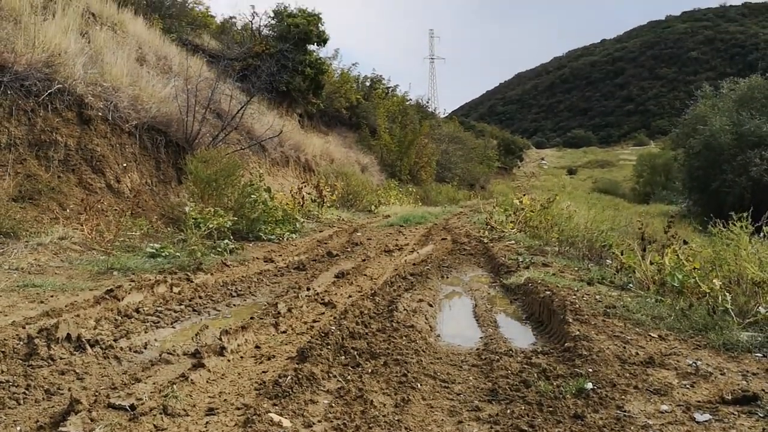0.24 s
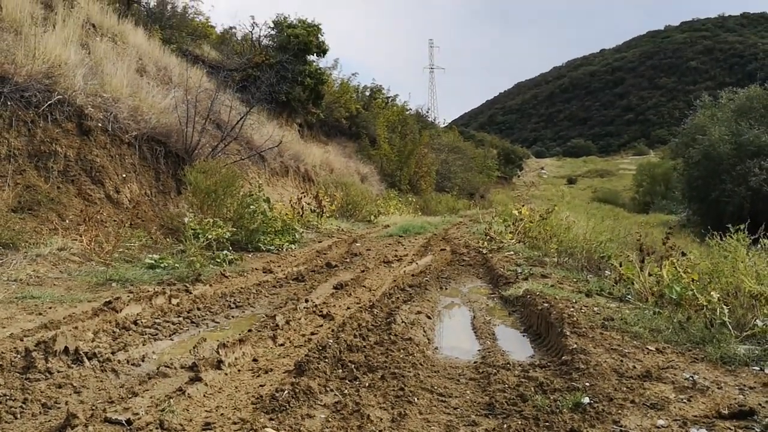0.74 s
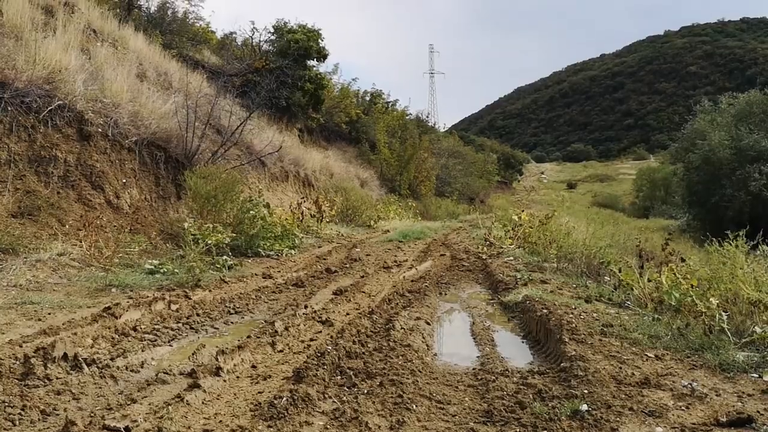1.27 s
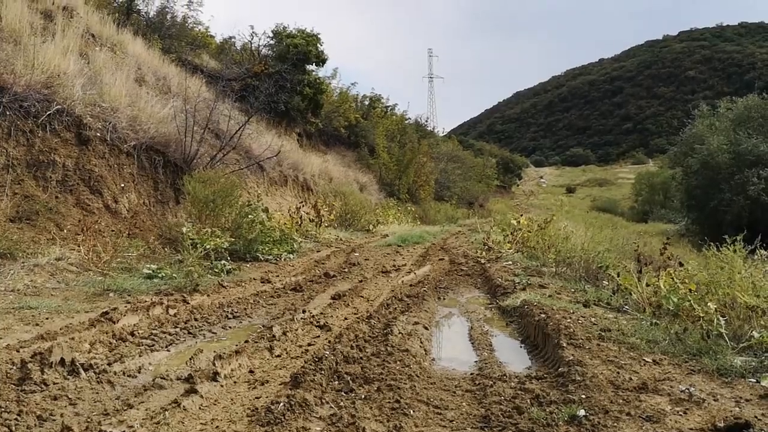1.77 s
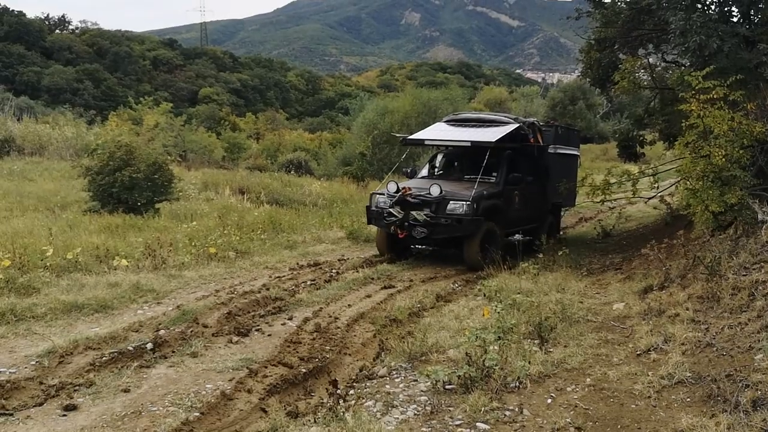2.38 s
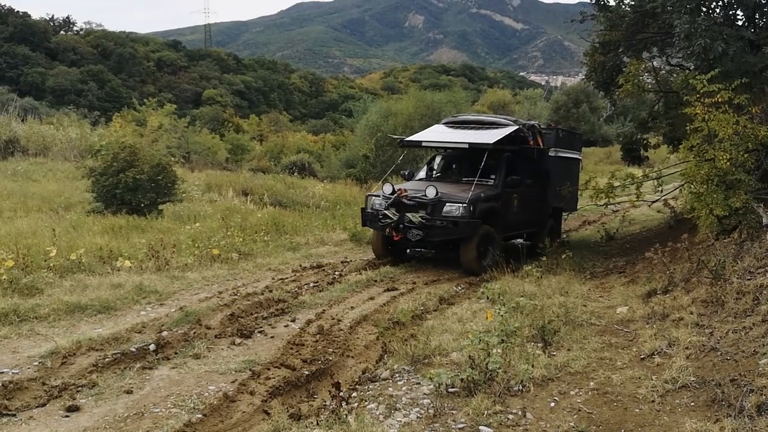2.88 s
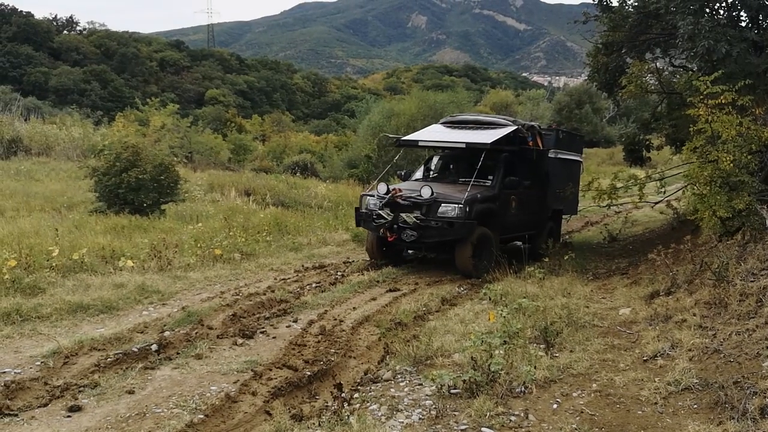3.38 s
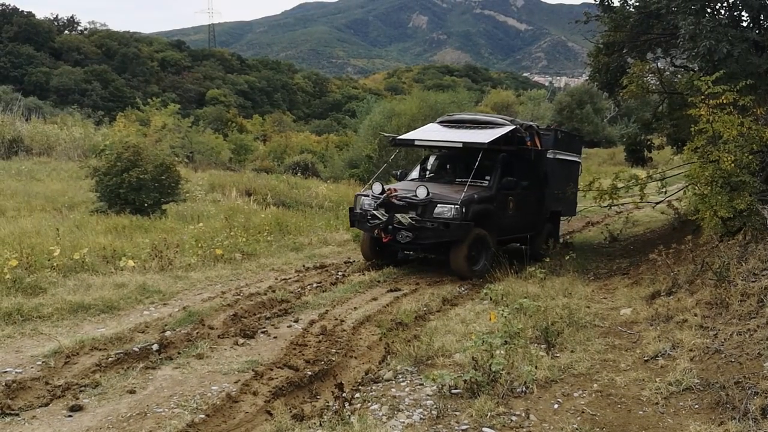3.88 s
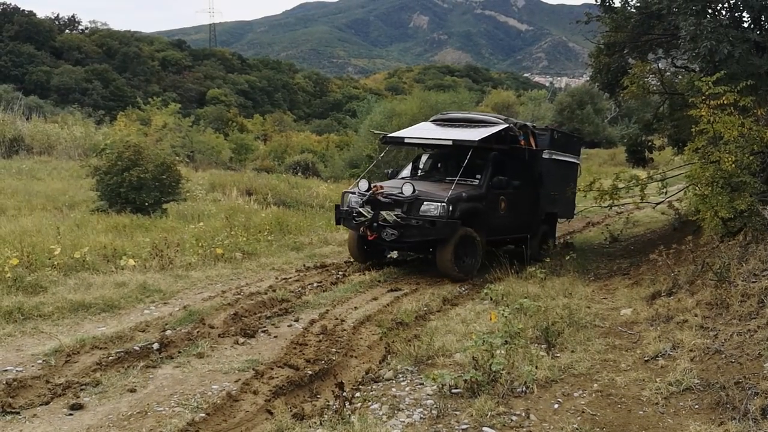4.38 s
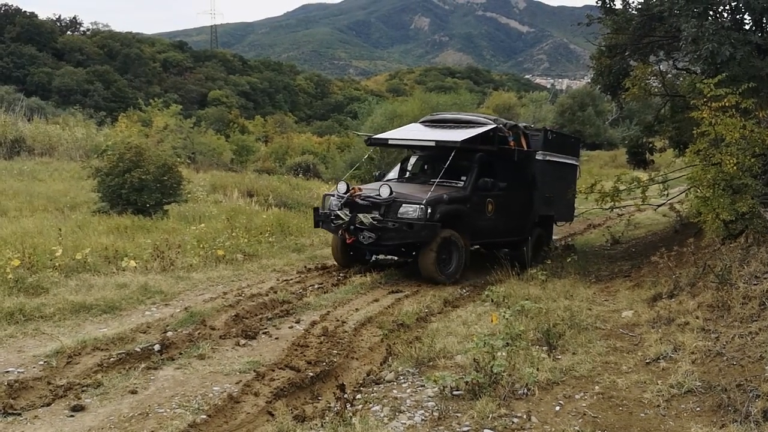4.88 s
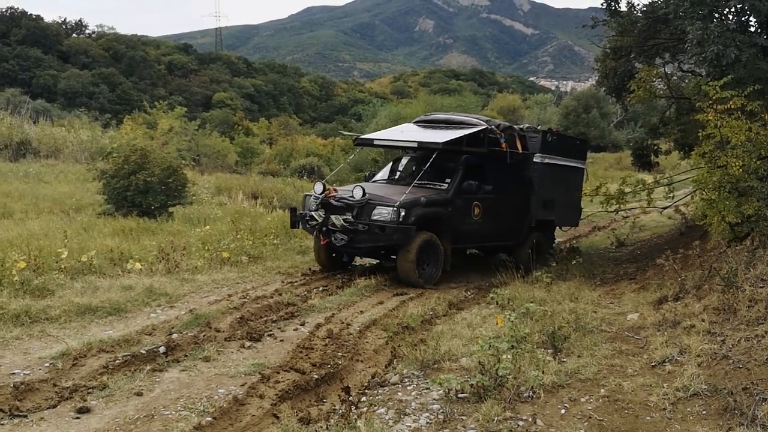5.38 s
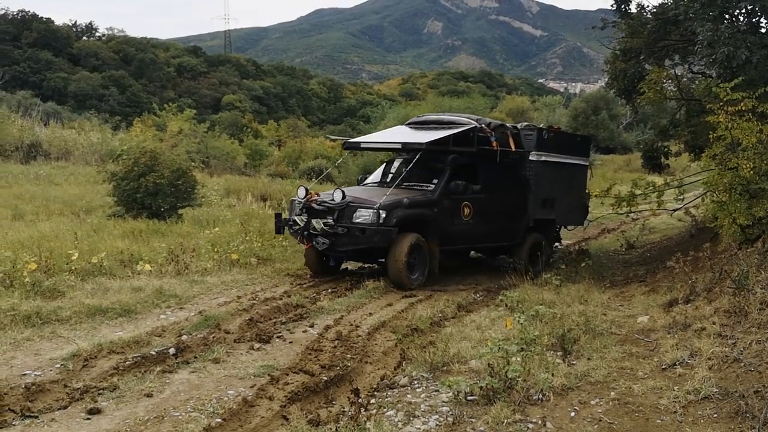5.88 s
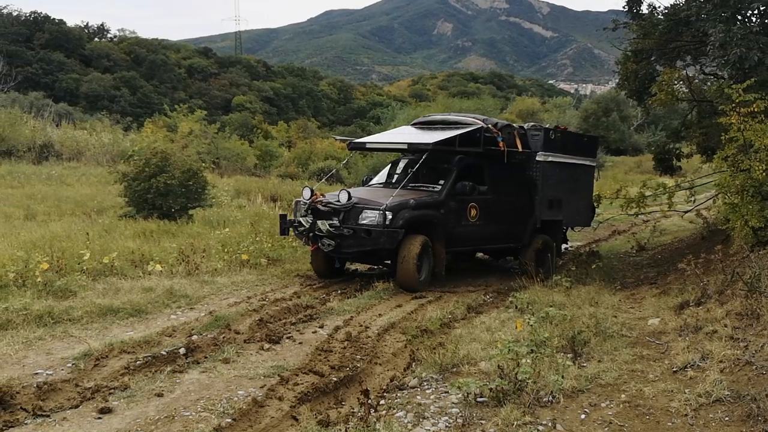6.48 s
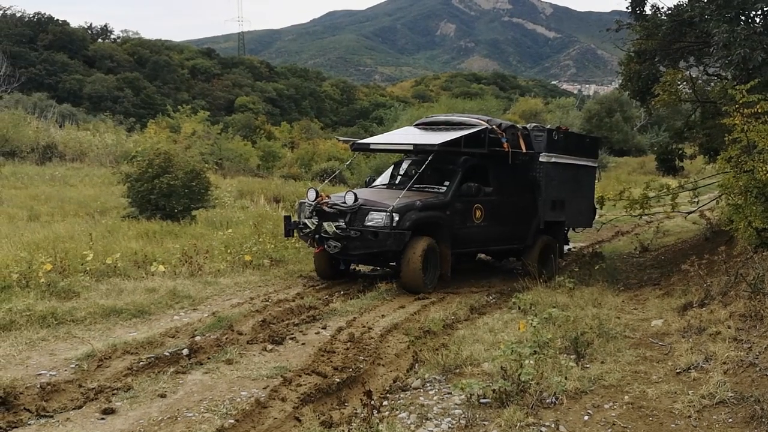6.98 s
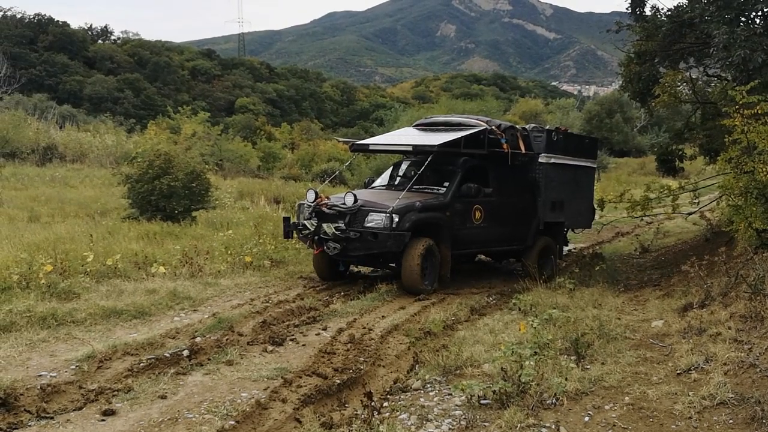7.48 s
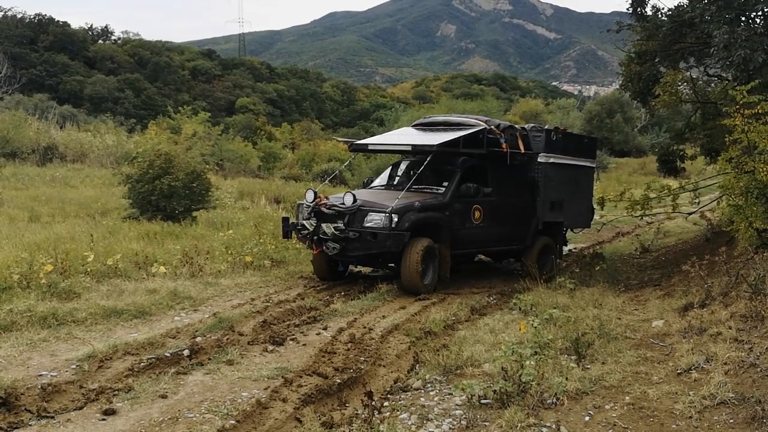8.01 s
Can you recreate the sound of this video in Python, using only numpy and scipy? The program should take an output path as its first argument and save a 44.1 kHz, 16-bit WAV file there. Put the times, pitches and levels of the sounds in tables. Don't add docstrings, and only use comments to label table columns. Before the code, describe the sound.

Quiet insect chirps and soft wind thumps cut to a four-cylinder diesel engine straining slowly through ruts, springs squeaking, grit ticking, revs finally dropping.

```python
import sys
import numpy as np
from scipy import signal
from scipy.fft import rfft, irfft
from scipy.io import wavfile

SR = 44100
rng = np.random.default_rng(int(sys.argv[2]) if len(sys.argv) > 2 else 0)


def undo_db(level):
    steps = np.asarray(level, float) / 20
    return 10 ** steps


def transcribe(u):
    v = np.clip(np.atleast_2d(u).T, -1, 1)
    q = np.round(v * 32767).astype(np.int16)
    wavfile.write(sys.argv[1], SR, q)


N = 363825
T = np.arange(N) / SR
BIN_HZ = np.maximum(np.fft.rfftfreq(N, 1 / SR), 1)
CUT_S = 1.925
MIDWAY_S = 5
RUTS_S = 6.0

# frequency in Hz, left-right likeness [-1 to 1].
LIKENESS = [(60, 0.982), (100, 0.985), (180, 0.97), (320, 0.93), (550, 0.6), (960, 0.96), (1660, 0.86),
            (2200, 0.6), (2900, 0.45), (5040, 0.3), (8770, 0.1)]


def unit(x):
    return x / np.sqrt(np.mean(x ** 2) + 1e-20)


def hump(x, centre, width):
    return np.exp(-((x - centre) / width) ** 2)


def in_time(rows):
    s, *columns = np.transpose(rows)
    return [np.interp(T, s, c) for c in columns]


def at_hz(points, hz):
    points = np.array(points)
    return np.interp(np.log(hz), np.log(points[:, 0]), points[:, 1])


def drift(rate_hz):
    r = np.exp(-80 * np.pi * rate_hz / SR)
    slow = signal.lfilter([1], [1, -2 * r, r * r], rng.standard_normal(N // 40 + 2002))[2000:]
    return np.interp(np.arange(N) / 40, np.arange(len(slow)), unit(slow))


def pair(mid, side, alike):
    alike = np.clip(alike, -1, 1)
    return np.sqrt(1 + alike) * mid + np.sqrt(1 - alike) * side * np.array([[1], [-1]])


def banded(spectrum, patchy_db, likeness=LIKENESS):
    low_hz, high_hz = spectrum[0][0], spectrum[-1][0]
    edges_hz = np.geomspace(low_hz, high_hz, int(3 * np.log2(high_hz / low_hz)) + 2)
    together = drift(3.0)
    white = rng.standard_normal((2, 2, N))
    out = 0
    for k, (low, high) in enumerate(zip(edges_hz, edges_hz[1:])):
        band = signal.butter(2, [low, high], "band", fs=SR, output="sos")
        mid, side = signal.sosfilt(band, white[k % 2])
        alike = at_hz(likeness, np.sqrt(low * high))
        flicker_db = patchy_db * (0.18 * together + drift(31.0))
        out = out + undo_db(flicker_db) * pair(mid, side, alike)
    return unit(irfft(rfft(out) * undo_db(at_hz(spectrum, BIN_HZ)), N))


def resonance(x, hz, width_hz):
    r = np.exp(-np.pi * width_hz / SR)
    zeros = np.array([1, 0, -1]) * (1 - r * r) / 2
    return signal.lfilter(zeros, [1, -2 * r * np.cos(2 * np.pi * hz / SR), r * r], x)


def add(out, s, sound):
    i = round(s * SR)
    out[..., i:i + sound.shape[-1]] += sound[..., :N - i]


def cricket(strokes, length_s, start_share, end_share, left_db, right_db, overtone_db):
    lead_s = .0075
    out, u = np.zeros(N), np.linspace(0, 1, int(length_s * SR))
    swell = np.sin(np.pi * u ** 1.25) ** 1.3
    for s, db, hz in strokes:
        glide_hz = hz * np.interp(u, [0, .5, 1], [start_share, 1, end_share])
        phase = 2 * np.pi * np.cumsum(glide_hz) / SR
        tone = undo_db(db) * np.sin(phase) + undo_db(overtone_db) * np.sin(2 * phase)
        add(out, s - lead_s, swell * tone)
    out += undo_db(-32) * np.roll(out, int(0.0096 * SR))
    return out * undo_db(np.array([[left_db], [right_db]]))


def near_strokes():
    # starts of the three full strokes in seconds, level in dB.
    chirps = [
        (.0834, .118, .159, -47),
        (.4615, .4993, .5375, -44),
        (.7452, .78, .82, -47),
        (1.034, 1.07, 1.108, -48.5),
        (1.346, 1.3848, 1.421, -47),
        (1.6551, 1.6896, 1.7275, -45),
        (1.934, 1.97, 2.01, -44),
    ]
    # level in dB, frequency in Hz.
    shape = [(-15, 4800), (-2.5, 4930), (0, 4980), (0, 4970)]
    upbeat_s = .032
    strokes = []
    for *full, db in chirps:
        starts_s = [full[0] - upbeat_s] + full
        strokes += [(s, db + step_db, hz) for s, (step_db, hz) in zip(starts_s, shape)]
    return strokes


def far_strokes(chirps, gap_s, hz, sink_hz):
    strokes = []
    for s, count, db in chirps:
        for k in range(round(count)):
            start_s = s + gap_s * (k + rng.normal(0, 0.091))
            stroke_db = db + rng.normal(0, 2.5)
            strokes.append((start_s, stroke_db, hz - sink_hz * (k + rng.normal(0, 1))))
    return strokes


def far_crickets():
    # start in seconds, strokes, level in dB.
    ahead = [(.085, 2, -75), (.167, 3, -63.5), (.282, 2, -69), (.44, 2, -72), (.521, 3, -63), (.78, 2, -73),
             (.854, 3, -64.5), (1.197, 1, -74), (1.245, 2, -68), (1.265, 3, -67), (1.407, 2, -73),
             (1.5, 2, -75), (1.59, 2, -71), (1.655, 3, -67), (1.68, 2, -71)]
    # start in seconds, strokes, level in dB.
    aside = [
        (.233, 3, -77),
        (.604, 2, -50),
        (.922, 2, -57),
    ]
    out = cricket(far_strokes(ahead, gap_s=.041, hz=4090, sink_hz=45), length_s=.028,
                  start_share=1.025, end_share=.95, left_db=-1.5, right_db=-5, overtone_db=-83)
    out += cricket(far_strokes(aside, gap_s=0.032, hz=4930, sink_hz=-38.5), length_s=0.0233,
                   start_share=.93, end_share=.93, left_db=-24, right_db=-12, overtone_db=-80)
    return out


def chorus():
    # strokes per second, frequency in Hz, level in dB.
    callers = [(26.6, 4720, -79), (24.8, 4600, -84), (24.1, 4080, -85), (29.3, 4780, -82)]
    out = np.zeros((2, N))
    for per_s, hz, db in callers:
        u = np.cumsum(per_s * (1 + 0.034 * drift(3.0))) / SR % 1
        swell = np.sin(np.pi * np.minimum(u / 0.73, 1))
        stroke = swell * np.sin(2 * np.pi * np.cumsum(hz * (1.04 - 0.1 * u)) / SR)
        port_db = 2.3 * np.array([drift(12.0) + 0.54, drift(9.7) - 2.5])
        out += undo_db(db + 3.9 * np.tanh(drift(1.6)) + port_db) * stroke
    return out


def whistle(notes):
    out = np.zeros(N)
    for note in notes:
        hz, db = in_time(note)
        phase = 2 * np.pi * np.cumsum(hz * (1 + 0.012 * drift(110))) / SR
        sounding = (T > note[0][0]) * (T < note[-1][0])
        out += undo_db(db - 1 + 2 * drift(100)) * np.sin(phase) * sounding
    echo = undo_db(-4) * np.roll(out, int(0.019 * SR))
    return out * undo_db(np.array([[-1.5], [1.5]])) + echo * np.array([[1], [.6]])


def bird_flicks():
    # share of the note, frequency in Hz, level in dB.
    shape = [(0, 1980, -8), (.27, 2060, -3), (.7, 3480, -2), (.78, 3540, -1), (1, 2850, -5)]
    # start in seconds, length in seconds, level in dB, extra dB of the hook.
    flicks = [
        (0.112, 0.073, -67, 3),
        (0.257, 0.064, -71, 10),
    ]
    return whistle([[(s + length_s * u, hz, db + step_db + hook_db * (hz < 2200)) for u, hz, step_db in shape]
                    for s, length_s, db, hook_db in flicks])


def bird_slurs():
    # start in seconds, length in seconds, from Hz, to Hz, level in dB.
    slurs = [
        (0.605, 0.033, 3080, 2730, -69.5),
        (0.63, 0.042, 2300, 2780, -75),
        (0.66, 0.045, 2730, 2540, -74),
        (0.852, .075, 3060, 2880, -75),
        (0.92, 0.045, 2900, 2150, -76),
    ]
    return whistle([[(s, hz0, db + 1.5), (s + length_s / 2, (hz0 + hz1) / 2, db), (s + length_s, hz1, db - 2)]
                    for s, length_s, hz0, hz1, db in slurs])


def hillside(x):
    t60_s, tail_db = 0.25, -2.5
    tail = rng.standard_normal((2, SR // 2)) * undo_db(-60 * np.arange(SR // 2) / SR / t60_s)
    tail /= np.sqrt(np.sum(tail ** 2) / 2)
    return x + undo_db(tail_db) * signal.fftconvolve(x, tail, axes=1)[:, :N]


def meadow_wind():
    # time in seconds, level in dB.
    gusts = [(0.0, -51), (0.03, -47), (0.096, -41), (0.14, -67), (0.288, -36.5), (0.374, -53),
             (0.454, -49.5), (0.56, -55), (0.6, -41.5), (0.684, -43), (0.72, -51.5), (0.95, -56.5),
             (1.0, -39), (1.052, -47), (1.1, -61.5), (1.7, -58.5), (1.754, -54.5), (1.92, -63)]
    # frequency in Hz, level in dB per Hz.
    spectrum = [(8.8, -6), (15, -7.5), (34, -12), (81, -19.5), (139, -43), (162, -44), (247, -61),
                (280, -54), (400, -65), (520, -97), (880, -120)]
    likeness = [(60, 1.0), (120, 0.91), (250, 0.33)]
    wind = undo_db(in_time(gusts)[0]) * banded(spectrum, patchy_db=5.5, likeness=likeness)
    wind[0] = np.roll(wind[0], 25)
    return wind


def meadow_air():
    # frequency in Hz, level in dB per Hz.
    spectrum = [(120, 5.5), (195, 6.5), (270, -1), (500, -3.5), (1000, -5), (2200, -5), (3300, -9),
                (4000, -9.5), (4600, 5.5), (5300, -10), (8000, -14.5), (9500, -16), (12000, -21.5),
                (15500, -35)]
    likeness = [(190, 0.98), (280, 0.56), (500, -0.63), (2000, 0.0076), (4000, -0.18)]
    return undo_db(-67.5 + np.array([[1.5], [-1.5]])) * banded(spectrum, patchy_db=2.5, likeness=likeness)


def meadow():
    near = cricket(near_strokes(), length_s=.0235, start_share=.93, end_share=.99,
                   left_db=5, right_db=-10, overtone_db=-85)
    far = hillside(bird_slurs() + far_crickets() + chorus())
    mix = meadow_wind() + meadow_air() + near + bird_flicks() + far
    return mix * np.clip((CUT_S - T) / .008, 0, 1)


def firing_multiples(turn, firing_hz, effort_db):
    # time in seconds, level in dB, extra dB of the lowest line.
    bark = [(1.93, 1, -6.5), (3.0, -1, 1), (3.15, -2.5, 2), (3.9, -1, -1.5), (4.2, -8, -3), (5.3, 5, -3.5),
            (5.48, -4, -7), (5.6, 1, 2), (5.74, -1, -7), (5.8, -5, 2), (5.95, -15, .3), (6.05, -8, 8.5),
            (6.5, -3.5, 4.5), (7.15, -1.5, -2), (7.55, -9, 1), (7.75, -2, -1), (7.97, 10.5, 3),
            (8.25, 2, 1)]
    # frequency in Hz, level in dB.
    pipe = [(45, -45), (57, -38.5), (64, -36.5), (71, -37), (77, -52), (100, -29), (114, -40), (130, -38),
            (148, -38), (172, -42), (225, -44), (300, -44.5)]
    order_db = [0, 0, -3, -6]
    bark_db, lowest_db = in_time(bark)
    out = np.zeros(N)
    for k in range(4):
        db = at_hz(pipe, (k + 1) * firing_hz) + 1.57 * effort_db + bark_db + order_db[k] + 1.2 * drift(11.5)
        if k == 0:
            db = db + lowest_db
        if k > 1:
            db = db + 2.5 * np.minimum(T - MIDWAY_S, 0)
        out += undo_db(db) * np.sin((k + 1) * turn + rng.uniform(0, 6.9))
    return out


def lines_between(turn, firing_hz, rumble_db):
    # turns of the full cycle, level in dB relative to the rumble.
    lines = [(6, -15), (7, -14), (9, -16), (10, -15), (11, -13), (13, -20), (14, -19), (15, -10.5),
             (17, -25), (18, -28), (20, -29)]
    rut_db = -4 * (T > RUTS_S)
    out = np.zeros(N)
    for k, db in lines:
        boom_db = 0.5 * hump(k * firing_hz / 4, centre=298, width=51)
        out += undo_db(rumble_db + db + rut_db + boom_db + 3.2 * drift(5.1)) * np.sin(k * turn / 4 + rng.uniform(0, 4.96))
    return out


def passing_lines(turn):
    # turns of the full cycle, start in seconds, end in seconds, level in dB.
    lines = [(39, 2.1, 2.9, -59), (44, 2.8, 3.7, -58), (40, 2.9, 5.4, -58), (35, 3.95, 4.45, -51),
             (38, 4.2, 5.1, -56), (34, 4.8, 5.55, -56), (37, 5.8, 6.2, -60), (37, 6.9, 7.9, -57),
             (88, 4.4, 5.15, -52), (91, 4.4, 5.1, -52), (96, 4.1, 5.1, -54), (96, 7.1, 7.6, -53),
             (80, 3.2, 4.5, -59), (80, 5.55, 6.05, -59), (80, 5.85, 6.7, -55.5), (80, 6.6, 7.15, -60)]
    out = np.zeros(N)
    for k, start_s, end_s, db in lines:
        waver_db, jitter = (2, .011) if k == 80 else (3, .017)
        swell = np.sin(np.pi * np.clip((T - start_s) / (end_s - start_s), 0, 1)) ** .7
        out += undo_db(db + waver_db * drift(8)) * swell * np.sin(k * turn / 4 + jitter * k * drift(9))
    return out


def exhaust(firing_hz, effort_db, rumble_db):
    turn = 2 * np.pi * np.cumsum(firing_hz * (1 + .003 * drift(8))) / SR
    lines = firing_multiples(turn, firing_hz, effort_db) + lines_between(turn, firing_hz, rumble_db)
    return np.sqrt(2) * (lines / 1 + passing_lines(turn)), turn / (2 * np.pi)


def rumble(level_db):
    # frequency in Hz, level in dB per Hz.
    spectrum = [(26, -34), (45, -1), (97, -4), (145, -0.5), (232, -8.5), (290, -7), (318, -15.5),
                (371, -21), (432, -35.5), (520, -26.5), (680, -43), (1140, -120)]
    lump_db = np.where(T < RUTS_S, 1.5, 2.6) * drift(5.2)
    return undo_db(level_db - 1.0 + lump_db) * banded(spectrum, patchy_db=2.0)


def buffeting(level_db):
    # centre in seconds, half-width in seconds, level in dB over the lull.
    thumps = [(2.617, 0.095, 7), (3.495, 0.17, 5.5), (3.89, 0.047, 7), (4.648, 0.11, 4.5), (5.182, 0.1, 7),
              (5.466, 0.053, 5), (5.722, 0.17, 11.5), (6.226, 0.07, 9.5), (6.78, 0.079, 9.5),
              (7.067, .04, 9.5), (7.257, 0.06, 9), (7.533, .05, 2), (7.808, 0.12, 8), (8.141, 0.12, 19.5)]
    # frequency in Hz, level in dB per Hz.
    spectrum = [(9, -10), (15, 4.5), (24, -5), (36, -6), (50, -27), (80, -28), (200, -49)]
    thump_db = sum(db * hump(T, s, length_s) for s, length_s, db in thumps)
    return undo_db(level_db - 4.5 + thump_db) * banded(spectrum, patchy_db=-3.0)


def clatter(firings, level_db):
    cylinder_db = [1.5, -3.5, 2, -0.5]
    # frequency in Hz, level in dB per Hz.
    spectrum = [(250, -41), (420, -15), (738, -2.5), (927, -7.5), (1270, -7), (1700, -7.5), (2350, -7.5),
                (3120, -11.5), (3400, -9.5), (4130, -23), (5600, -33), (7280, -56), (12300, -120)]
    # frequency in Hz, level in dB per Hz.
    hiss = [(4000, -7), (5000, -3.5), (5580, -6.5), (5950, -9.5), (6400, -7), (6950, -1), (7700, 0.5),
            (8200, -4), (9220, -17.5), (10000, -27), (12000, -32), (14500, -28.5), (15700, -34)]
    # group, frequency in Hz, width in Hz, level in dB, knock depth [0-1].
    block = [(0, 725, 131, -9, 0), (1, 1640, 153, -7, 0.52), (1, 1797, 129, -4.5, 0.07),
             (1, 2384, 140, -23, 0.22), (2, 3400, 140, -2.5, 0.62), (2, 3900, 129, -4, 0.4),
             (2, 4370, 198, -5, 0.3), (2, 5630, 159, -12, 0.1)]
    count = firings.astype(int)
    ringing_db = [level_db[name] for name in ("low", "middle", "rattle")]
    strength_db = np.array(cylinder_db)[count % 4] + np.clip(rng.normal(0, 2.9, 1000), -7, 7)[count]
    knock = unit(undo_db(strength_db) * np.exp(-2.5 * (firings % 1)))
    out = undo_db(level_db["clatter"] - 3.5) * banded(spectrum, patchy_db=1.0) * (1 + 0.16 * knock)
    for group, hz, width_hz, db, depth in block:
        mid, side = rng.standard_normal((2, N)) * (1 + np.clip(depth, 0, 1) * (knock - 1))
        struck = pair(mid, side, at_hz(LIKENESS, hz))
        rung = resonance(resonance(struck, hz, width_hz), hz, 2.9 * width_hz)
        out += undo_db(ringing_db[round(group)] + db + 0.2 * drift(0.94)) * unit(rung)
    return out + undo_db(level_db["hiss"]) * banded(hiss, patchy_db=1.5) * (0.8 + 0.15 * knock)


def tappet():
    # time in seconds, peak level in dB.
    strikes = [(2.0208, -62), (2.0906, -59), (2.1585, -58), (2.2243, -57), (2.3245, -61), (2.422, -63),
               (2.4937, -62), (2.588, -58), (2.6782, -55), (2.7384, -51), (2.7985, -57), (2.8597, -44),
               (2.9193, -44), (2.978, -41), (3.04, -44), (3.096, -47), (3.1423, -40), (3.2148, -38.5),
               (3.266, -44.5), (3.3357, -50), (3.3892, -41), (3.4517, -47), (3.5076, -51), (3.5663, -51),
               (3.6247, -47), (5.6984, -40), (5.7654, -42), (5.889, -45), (5.9389, -44), (6.0283, -40),
               (6.101, -43), (6.1734, -44), (6.2432, -48), (6.9128, -46)]
    hz, width_hz = 3320, 42
    clicks = np.full(N, 1e-18)
    for s, db in strikes:
        add(clicks, s, undo_db(db - 5) * np.array([SR / np.pi / width_hz * 2.03]))
    return resonance(resonance(clicks, hz, width_hz), hz, 3 * width_hz) / 2


def bumps():
    # time in seconds, peak level in dB.
    ticks = [(5.5318, -43), (5.582, -44), (5.641, -30), (5.7435, -28), (5.799, -45), (5.856, -35),
             (5.897, -40), (5.986, -32.5), (6.024, -37), (6.0512, -30), (6.241, -25), (6.323, -34),
             (6.3617, -36), (6.675, -32.5), (7.028, -39), (7.0974, -28), (7.191, -48), (7.3486, -51),
             (7.62, -50.5), (7.907, -38)]
    # time in seconds, peak level in dB, frequency in Hz.
    knocks = [
        (2.338, -45, 2500),
        (2.35, -45, 2480),
        (5.332, -44, 1960),
        (7.859, -41, 790),
        (8.094, -45, 790),
    ]
    clicks, out = np.full(N, 1e-18), np.zeros(N)
    for s, db in ticks:
        add(clicks, s, undo_db(db + 12) * rng.standard_normal(176) * np.exp(-np.arange(176) / 45))
    for s, db, hz in knocks:
        burst = rng.standard_normal(1800) * np.exp(-np.arange(1800) / 500)
        add(out, s, undo_db(db + 21.5) * resonance(resonance(burst, hz, 180), hz, 400))
    ring = resonance(resonance(resonance(clicks, 7750, 600), 7600, 1200), 7500, 2000)
    return out + ring + undo_db(-46) * np.diff(clicks, prepend=0)


def treble_dropouts(x):
    # start in seconds, length in seconds, edge in Hz.
    gaps = [
        (5.005, .055, 10200),
        (5.12, .065, 9000),
        (5.185, .045, 9900),
        (5.378, .05, 10000),
        (5.497, .07, 10100),
        (5.6, .055, 11200),
        (5.655, .055, 9300),
    ]
    for s, length_s, hz in gaps:
        top = irfft(rfft(x) * (BIN_HZ > hz), N)
        gate = np.clip(np.minimum(T - s, s + length_s - T) / .008 + 1, 0, 1)
        x = x - (1 - undo_db(-40)) * top * gate
    return x


def crushed_rust():
    start_s, end_s, grains_per_s = 4.85, 5.75, 2500
    grains = unit(rng.standard_normal(N) * (rng.random(N) < grains_per_s / SR)) * undo_db(-44 + 6.3 * drift(25))
    return treble_dropouts(grains) * np.sin(np.pi * np.clip((T - start_s) / (end_s - start_s), 0, 1))


def squeaks():
    # start in seconds, length in seconds, slips per second, level in dB, first multiple in dB.
    slips = [(4.894, 0.093, 2200, -50, 4), (4.981, 0.12, 2440, -47.5, 0), (5.066, 0.019, 2130, -44.5, -16),
             (5.086, 0.045, 2390, -39.5, -8), (5.095, 0.022, 2840, -47, -12),
             (5.102, 0.027, 4750, -34.5, 4), (5.126, .025, 3950, -35, -12), (5.153, 0.027, 3880, -30, -7.5),
             (5.185, 0.062, 2300, -42, -15), (5.174, 0.024, 2400, -47.5, 0), (5.204, 0.072, 2890, -47, -9),
             (5.22, 0.054, 2440, -43, -10), (5.264, 0.031, 2540, -51.5, 7.5),
             (5.324, 0.045, 1820, -49, 13.5), (5.335, 0.043, 2530, -48.5, 2), (5.355, 0.11, 3105, -49.5, 2),
             (5.467, 0.1, 3100, -54.5, 7.5), (5.521, 0.021, 4000, -49, 9), (5.55, 0.059, 3825, -44.5, -10),
             (5.59, 0.033, 3600, -45, -12), (5.626, 0.058, 3900, -43.5, 3.5), (5.66, 0.077, 4070, -70, -8)]
    # frequency in Hz, level in dB.
    spring = [(1800, -10), (2500, -6), (4000, -11), (4750, -13), (5200, -15), (6000, -4), (6600, -7),
              (7700, 0), (9300, -25), (10500, -35), (12200, -34), (15000, -43)]
    sag_per_s, dry_s, brighten_db = .12, 5.35, 13
    out = np.zeros(N)
    waver, catch, uneven = drift(90), undo_db(2.2 * drift(80)), drift(460)
    for start_s, length_s, hz, db, first_db in slips:
        waver, catch, uneven = np.roll([waver, catch, uneven], 9000, axis=1)
        on = np.flatnonzero((T >= start_s - .01) & (T < start_s + length_s + .01))
        slip_hz = hz * (1 - sag_per_s * (T[on] - start_s)) * (1 + .005 * waver[on])
        phase = 2 * np.pi * np.cumsum(slip_hz) / SR
        tone = 0
        for k in range(1, int(15000 / hz) + 1):
            bright_db = brighten_db * (start_s > dry_s) * (k * hz > 9000)
            tone = tone + undo_db(first_db * (k == 1) + bright_db) * np.sin(k * phase)
        swell = np.hanning(len(on)) ** .4
        out[on] += undo_db(db + 4.5) * swell * catch[on] * tone * (1 + .55 * uneven[on])
    grains = crushed_rust()
    dust = rfft(grains) * undo_db(-28.5) * (BIN_HZ > 9800)
    out = irfft(rfft(out + grains) * undo_db(at_hz(spring, BIN_HZ)) + dust, N)
    return out + undo_db(-17) * np.roll(out, int(.017 * SR)) + undo_db(-21) * np.roll(out, int(.041 * SR))


def ports(x):
    # frequency in Hz, left minus right in dB.
    lean = [(190, 0), (410, -1), (600, 3), (880, 2.5), (1290, 0.1), (1890, -3.5), (2780, 8.5), (4070, 6),
            (5000, 20), (8770, 21.5), (10000, 12), (11500, 2)]
    # frequency in Hz, phase lead of the left port in radians.
    lead = [(100, .02), (2150, .5), (3530, .6), (4570, 1.5)]
    lean_db = at_hz(lean, BIN_HZ)
    dip_db = -17.5 * hump(BIN_HZ, centre=3600, width=17)
    level = np.sqrt(2 / (1 + undo_db(-2 * lean_db))) * undo_db(dip_db)
    return irfft(rfft(x) * [level * np.exp(1j * at_hz(lead, BIN_HZ)), level * undo_db(-lean_db)], N)


def truck():
    # time in seconds, firings per second.
    speed = [(1.93, 56.4), (2.3, 59.8), (2.6, 64.3), (3.0, 67.5), (3.6, 68.8), (3.9, 71.4), (4.3, 73.3),
             (5.2, 76.2), (5.42, 75.2), (6.0, 57.1), (6.1, 56.2), (6.5, 58.2), (7.15, 71.2), (7.4, 74.3),
             (7.6, 72.4), (7.75, 67.6), (7.95, 54.1), (8.25, 43.1)]
    # time in seconds, effort in dB.
    effort = [(1.93, 4.5), (3.0, -0.5), (3.6, 0), (4.3, 3.5), (5.2, 0.5), (5.6, -0.5), (5.9, 0.5),
              (6.05, 2), (6.9, 2.5), (7.4, 1), (7.81, -0.5), (7.87, -5), (8.25, -17)]
    # level in dB, dB per octave of speed, share of effort, dB per second as the truck nears.
    follows = dict(wind=(-34.5, 0.5, 0.26, -0.17), rumble=(-36.5, 1.5, 0.37, 1.5),
               clatter=(-44.5, 7.5, 0.13, 0.32), hiss=(-52.5, 7, 0.15, 0.3), low=(-56, 13.5, -0.1, 1.3),
               middle=(-46, 10, .5, 0.27), rattle=(-65.5, 29.5, -0.36, -0.5))
    cruise_hz, fade_s = 70, 1
    (firing_hz,), (effort_db,) = in_time(speed), in_time(effort)
    octaves = np.log2(firing_hz / cruise_hz)
    level_db = {name: db + per_octave * octaves + share * effort_db + per_s * (T - MIDWAY_S)
                for name, (db, per_octave, share, per_s) in follows.items()}
    level_db["rattle"] = level_db["rattle"] + 12 * hump(firing_hz, centre=61.7, width=10.5)
    lines, firings = exhaust(firing_hz, effort_db, level_db["rumble"])
    low = rumble(level_db["rumble"]) + buffeting(level_db["wind"])
    mix = lines + low + treble_dropouts(clatter(firings, level_db)) + squeaks() + bumps()
    return ports(mix * np.clip((T - CUT_S) / fade_s, 0, 1) + tappet())


def next_shot():
    return undo_db(-59) * rng.standard_normal((2, N)) * (T > 8.243)


def scene():
    return meadow() + truck() + next_shot()


def band_limit(x):
    return signal.sosfilt(signal.butter(12, 15700, fs=SR, output="sos"), x)


def record(dry):
    return band_limit(dry)


dry = scene()
out = record(dry)
transcribe(out)
```